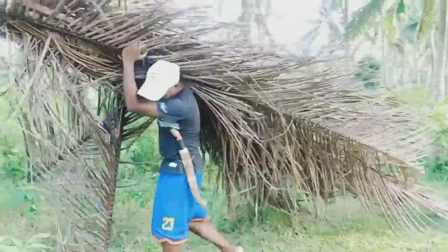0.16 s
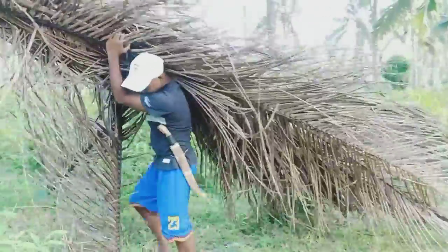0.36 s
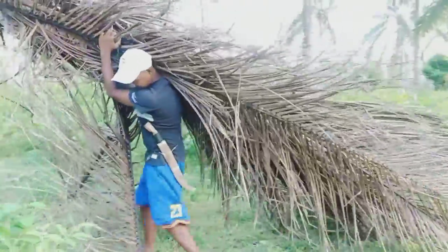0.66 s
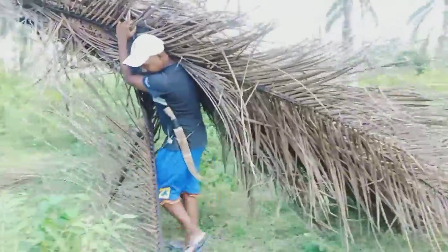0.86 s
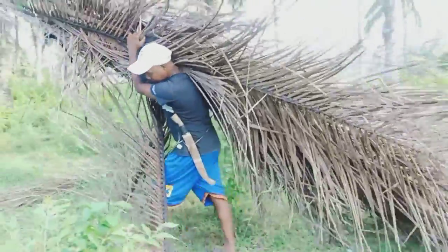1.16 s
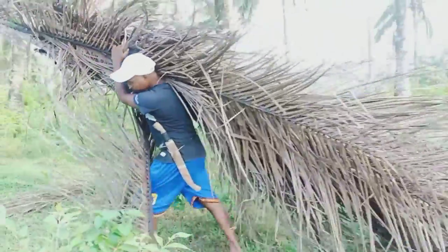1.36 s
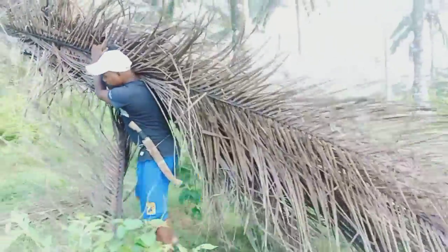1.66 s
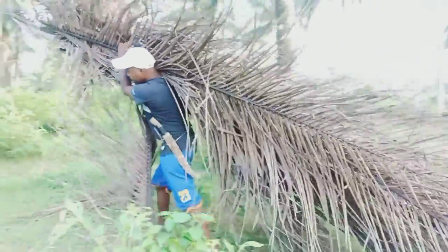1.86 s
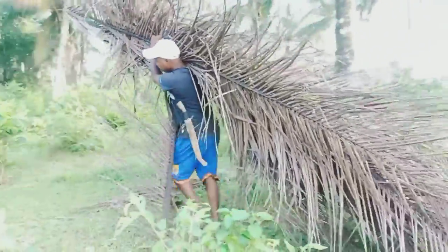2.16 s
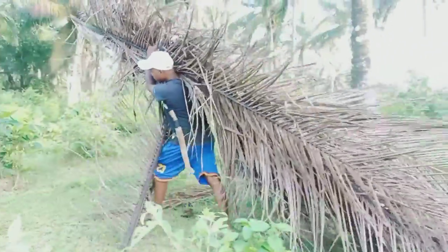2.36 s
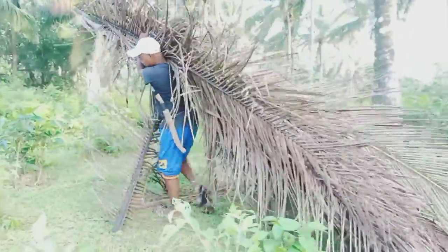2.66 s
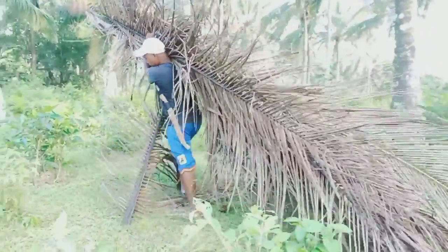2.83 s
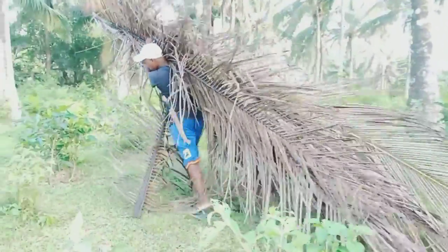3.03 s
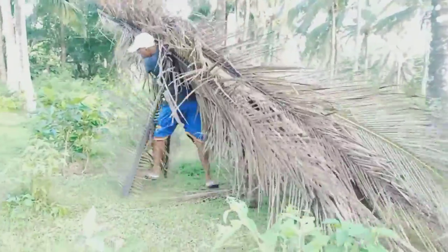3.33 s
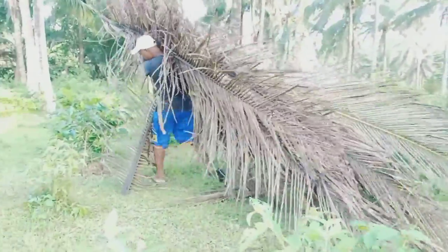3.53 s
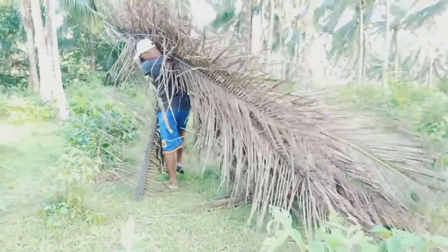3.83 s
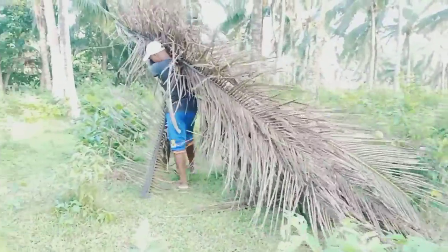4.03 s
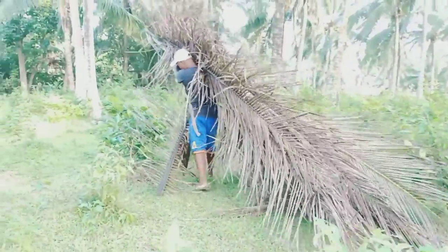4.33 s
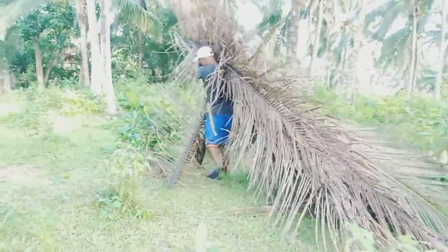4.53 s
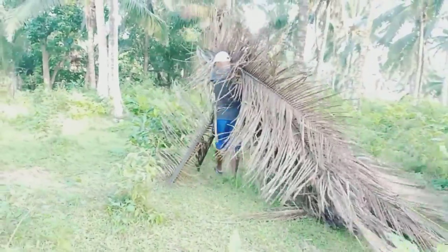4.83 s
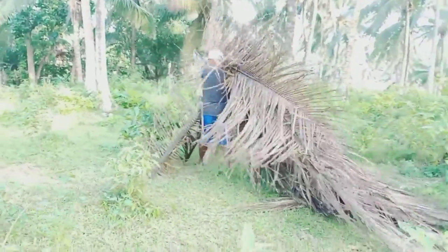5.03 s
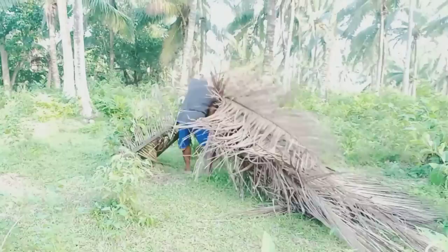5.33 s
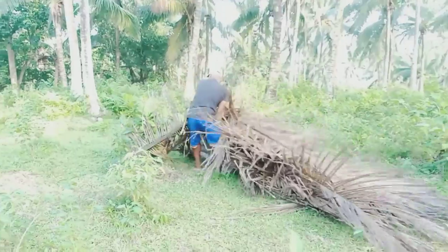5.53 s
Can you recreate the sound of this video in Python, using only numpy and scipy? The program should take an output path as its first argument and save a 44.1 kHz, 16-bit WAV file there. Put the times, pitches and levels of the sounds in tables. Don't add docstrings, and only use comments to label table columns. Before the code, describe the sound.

A big bundle of dry palm fronds rustles, crackles and scrapes over grass outdoors, with sharp snaps, then swings down with a dull thud.

```python
import sys
import numpy as np
from scipy import signal
from scipy.fft import rfft, irfft, next_fast_len
from scipy.io import wavfile
from scipy.ndimage import uniform_filter1d

SR = 44100
rng = np.random.default_rng(int(sys.argv[2]) if len(sys.argv) > 2 else 0)


def gain_from_db(level_db):
    decades = np.asarray(level_db, float) / 20
    return 10 ** decades


def file_out(sig):
    cols = np.atleast_2d(sig).T
    lim = np.clip(cols, -1, 1)
    pcm = np.round(lim * 32767).astype(np.int16)
    wavfile.write(sys.argv[1], SR, pcm)


N = 250929

# frequency in Hz, phase ahead of the left port in radians.
TURN_NEAR = [(1400, 0), (1900, -1.2), (2500, -.8), (3300, -2.2), (4000, -3.3), (4800, -3.4), (5400, -4.2),
             (6200, -5.8), (7500, -8), (15000, -22)]


def evened(x):
    return x / np.sqrt(np.mean(x ** 2) + 1e-20)


def read(points, hz):
    f, value = np.transpose(points)
    return np.interp(np.log(hz + 1), np.log(f + 1), value)


def add(mix, s, sound):
    part = mix[:, max(round(s * SR), 0):][:, :sound.shape[1]]
    part += sound[:, :part.shape[1]]


def causal(gain_db):
    log_gain = np.log(gain_from_db(gain_db))
    circle = np.concatenate([log_gain, log_gain[-2:0:-1]])
    return np.exp(np.conj(signal.hilbert(circle)))[:len(log_gain)]


def ports(paths, turn, shade=((1, 0), (2, 0))):
    # frequency in Hz, level in dB.
    colour = [(300, -12.5), (520, -11.5), (760, -16), (1000, -9), (1400, -11), (2050, -9.5), (2550, -3.44),
              (3300, -6), (3950, -3), (4450, -6), (5350, 2.65), (6150, -4), (6900, -14), (8800, -27)]
    # frequency in Hz, level in dB.
    ripple = [(8800, 0.0), (9200, -0.7), (9700, -4.2), (10500, -3.3), (11400, -0.4), (12200, -4.5),
              (13600, 1.3), (14300, -4.9), (14900, -5.0), (15600, -15.0)]
    # frequency in Hz, level difference in dB.
    lean = [(300, 1), (600, -1.5), (850, 5), (1200, -0.7), (2000, 0), (2600, -6), (3500, -10.5),
            (4400, -2.2), (5300, -0.5), (6000, -3.5), (7500, 4), (9000, 2), (10800, -4.5), (14000, 0.9)]
    # frequency in Hz, likeness from 0 to 1.
    likeness = [(200, .95), (400, .94), (750, .75), (1100, .85), (1900, .45), (2500, .5), (4200, .5),
                (5400, .48), (6500, .4), (8000, .26)]
    size = 2 * next_fast_len(paths.shape[-1] // 2 + 256)
    hz = np.fft.rfftfreq(size, 1 / SR)
    near, far = rfft(paths, size)
    colour_db = read(colour, hz) + read(ripple, hz) + read(shade, hz)
    half_lean_db = read(lean, hz) / 2
    left = causal(colour_db + half_lean_db)
    right = causal(colour_db - half_lean_db)
    same = np.clip(read(likeness, hz), 0, 1)
    late = np.exp(1j * (read(turn, hz) - np.angle(right / left)))
    at_right = same * late * near + np.sqrt(1 - same ** 2) * far
    return irfft([left * near, right * at_right], size)[..., :paths.shape[-1]]


def quarters(x, bass_hz=190):
    hz = np.fft.rfftfreq(x.shape[-1], 1 / SR)
    a, b, c = (1 / (1 + (hz / edge) ** 12) for edge in (1450, 4450, 7200))
    blade, tip, edge = b - a, 1 - c, c - b
    rib = a * (1 - 1 / (1 + (hz / bass_hz) ** 4))
    spectrum = rfft(x)
    return irfft([spectrum * band for band in (blade, rib, tip, edge)], x.shape[-1])


def crack(count, size, rise_s, tick_s, t60, scatter_db, ring_db):
    *noise, tint = rng.standard_normal((3, count, size))
    t = np.arange(size) / SR
    after = np.maximum(t - rise_s, 0)
    decay = np.exp(-after / tick_s) + gain_from_db(scatter_db - 60 * after / t60)
    burst = np.array(noise) * decay * np.minimum(t / rise_s, 1) ** 2
    patches = evened(uniform_filter1d(tint[:, :size // 2 + 1], size // 90, mode="wrap"))
    spectrum = rfft(burst)
    spectrum /= np.sqrt(uniform_filter1d(abs(spectrum) ** 2, size // 40))
    return irfft(spectrum * [causal(ring_db * patch) for patch in patches], size)


def hum(unlike=0.27, top_hz=200):
    # frequency in Hz, spectral density in dB per Hz.
    wash = [(15, -52), (25, -32), (70, -4), (86, 1.5), (116, -2.5), (188, -7.5), (300, -20), (390, -40),
            (660, -120)]
    common, left, right = rng.standard_normal((3, N))
    pair = common + unlike * np.array([left, right])
    hz = np.fft.rfftfreq(N, 1 / SR)
    gain = gain_from_db(read(wash, hz)) / (1 + (hz / top_hz) ** 4)
    return gain_from_db(-46.5) * evened(irfft(rfft(pair) * gain, N))


def haul(t):
    # time in seconds, effort in dB, crispness in dB.
    drag = [(0.0, -25, -0.5), (0.1, -32, 0), (0.35, -37, 0), (0.5, -33.5, -2), (1.1, -32, 0),
            (1.75, -34.5, 0), (2.1, -26, 1), (2.3, -30, 0.5), (2.72, -32, 0.5), (2.95, -29, 0.5),
            (3.3, -28, 1), (3.62, -28, -1), (3.9, -32, -0.5), (4.3, -34.5, 1), (4.85, -35.5, 0),
            (5.3, -28, -1.5), (5.49, -20.5, -1.5), (5.69, -20, -2.5)]
    # time in seconds, extra level in dB, half width in seconds.
    tugs = [
        (.6, 3, 0.04),
        (.8, 4.5, 0.073),
        (1.5, 4, 0.13),
        (2.55, 3, 0.29),
        (3.16, 5.5, 0.12),
        (3.69, 2.5, 0.054),
        (4.53, 4.5, 0.13),
        (5.17, 1, 0.063),
    ]
    # offset in dB, share of effort, share of crispness.
    answer = [
        (0, 1.04, -0.33),
        (-11, 0.82, -0.58),
        (-11, 1.02, 0.72),
        (-5, 1.15, 0.86),
    ]
    usual_db = -30
    s, effort_db, crisp_db = np.transpose(drag)
    tugs_db = sum(db * np.exp(-((t - at) / width) ** 2) for at, db, width in tugs)
    over_db = np.interp(t, s, effort_db) + tugs_db - usual_db
    crisp_db = np.interp(t, s, crisp_db)
    return [usual_db + db + effort * over_db + crisp * crisp_db for db, effort, crisp in answer]


def rustle(ticks_per_s=2200, spread_db=4.0, clump_db=0.99, patch_db=1.27, scrape_db=2.0, count=32):
    swing_s = 4.6, 5.3
    # frequency in Hz, phase ahead of the left port in radians.
    turn_far = [(1400, 0), (1900, -2), (2050, -4), (2500, -5.9), (3300, -6), (4000, -8.3), (4700, -9.1),
                (5600, -7.5), (6300, -9.6), (15000, -28)]
    # frequency in Hz, level in dB.
    shade_far = [(750, -0.5), (1100, -1), (2000, 0), (2550, 3), (3000, -4), (3900, -1), (4400, -3),
                 (5600, 0.5), (7200, -0.5)]
    clumps, *patches = (evened(uniform_filter1d(row, 700)) for row in rng.standard_normal((5, N)))
    size = gain_from_db(spread_db * np.minimum(rng.exponential(1, N), 3.6) + clump_db * clumps)
    size *= rng.random(N) < ticks_per_s / SR
    leaf = rng.integers(0, count, N)
    shapes = crack(count, size=1024, rise_s=0.00044, tick_s=0.0013, t60=0.044, scatter_db=-19.0, ring_db=4.0)
    ticks = np.zeros((2, N))
    for k in range(count):
        struck = (size * (leaf == k))[None]
        ticks += signal.oaconvolve(struck, evened(shapes[:, k]), axes=1)[:, :N]
    scrape = rng.standard_normal((2, N)) * gain_from_db(0.68 * clump_db * clumps)
    paths = evened(ticks) + gain_from_db(scrape_db) * evened(scrape)
    t = np.arange(N) / SR
    swing = np.interp(t, swing_s, [0, np.pi / 2])
    near = ports(paths * np.cos(swing), TURN_NEAR)
    far = ports(paths * np.sin(swing), turn_far, shade_far)
    out = np.zeros((2, N))
    for band, db, patch in zip(quarters(near + far), haul(t), patches):
        out += gain_from_db(db + patch_db * patch) * band / np.std(band.mean(0))
    return out


def snaps():
    # time in seconds, peak in dB, edge over blade in dB, splinter in dB.
    breaks = [(0.0333, -18.5, -1, -21), (0.169, -22, 2, -16), (0.2046, -14.5, 2, -5),
              (0.2308, -23, -1, -4.5), (0.4259, -25.5, -8, -16), (0.4773, -27, -2, -1),
              (0.5415, -21, 0, -19), (0.5774, -23.5, 3, -2), (0.6053, -22.5, -2, -8.5),
              (0.6405, -23, -13, -18), (0.711, -25, 1, -8), (0.7359, -21, 3, -4), (0.8147, -22, -9, -4),
              (0.8857, -14, 4.5, -10), (1.1423, -31.5, -33.5, -16), (1.2598, -19, -10, -10),
              (1.3485, -14.5, -10.5, -11), (1.4537, -19.5, -4, -16), (1.8687, -24, -5, -20),
              (1.9046, -27, 0, -18), (2.391, -24, 15, -14), (3.1574, -16.5, -5, -12),
              (3.1431, -14, -8, -16), (3.2311, -17.5, -3, 2.5), (3.4038, -27, -19, -12),
              (3.46, -18.5, -5, -5), (3.5051, -23, -11, -15), (3.7266, -23, -7, -10), (4.1388, -29, 24, 1),
              (4.5314, -28, 12, 6)]
    # time in seconds, peak in dB, edge over
    # blade in dB.
    weaker_breaks = [(.1047, -30, 7), (0.33, -31, 7), (0.3578, -28, -4), (0.5084, -28, 2), (0.846, -28, 19),
                     (1.012, -25.5, 10), (1.048, -28, 8), (1.5224, -27, 4), (1.709, -28, -3), (1.961, -30, 7),
                     (2.122, -25, 8), (2.193, -23, 4), (2.3432, -26, 4), (2.458, -28, -6), (3.014, -19, -3),
                     (2.949, -32, -2), (3.0544, -21.5, -2), (3.2643, -23.5, 6), (4.2174, -24, 9),
                     (4.2577, -23.5, -5), (4.2951, -25, 7), (4.3221, -30, 21), (4.4155, -26, 12),
                     (4.6235, -24.5, -11), (4.704, -28, -17), (4.812, -30, -1), (4.9227, -23, 1),
                     (4.9825, -29.5, -16), (5.112, -26.5, 5), (5.3278, -25, 5)]
    # frequency in Hz, level in dB.
    break_shade = [(3800, -1), (4600, -2), (5400, 3.5), (7300, -1.5), (9500, 1), (15000, 3.5)]
    weaker_splinter_db, rib_under_blade_db = -9.5, -15.5
    rows = breaks + [(*weaker, weaker_splinter_db) for weaker in weaker_breaks]
    shapes = crack(len(rows), size=1536, rise_s=0.0016, tick_s=0.001, t60=0.026, scatter_db=-6.0, ring_db=3.0)
    bands = quarters(ports(shapes, TURN_NEAR, break_shade))
    bands /= abs(bands.mean(1)).max(-1)[:, None, :, None]
    out = np.zeros((2, N))
    for k, (s, db, edge_db, splinter_db) in enumerate(rows):
        shares_db = [-edge_db / 2, rib_under_blade_db - edge_db / 2, splinter_db, edge_db / 2]
        gains = gain_from_db(db + np.array(shares_db) + [4.46, 3.7, 2.85, 2.16])
        add(out, s - 0.0006, np.tensordot(gains, bands[:, :, k], 1))
    return out


def knocks():
    # time in seconds, peak in dB, ring in Hz.
    bumps = [
        (0.424, -31, 505),
        (2.357, -28.5, 547),
        (2.628, -30, 152),
        (3.15, -32.5, 216),
        (4.81, -27.5, 544),
        (4.809, -35, 956),
    ]
    out = np.zeros((2, N))
    t = np.arange(2000) / SR
    for s, db, hz in bumps:
        turns = 2 * np.pi * hz * t
        ring = np.sin(turns) + 0.86 * np.sin(4.6 * turns) + 0.36 * np.sin(0.7 * turns)
        envelope = gain_from_db(db + 0.5 - 60 * t / 0.045) * np.minimum(t / 0.0033, 1)
        add(out, s + 0.00243, np.tile(envelope * ring, (2, 1)))
    return out


def squeaks():
    # start in seconds, length in seconds, first pitch in Hz, last pitch in Hz, level in dB.
    rubs = [
        (2.564, 0.076, 1720, 1670, -39),
        (4.398, .085, 1210, 1140, -47),
        (4.476, 0.043, 2410, 2270, -43),
        (4.479, .045, 1120, 1070, -44),
    ]
    out = np.zeros((2, N))
    for s, length, first_hz, last_hz, db in rubs:
        t = np.arange(0, length, 1 / SR)
        wobble_db = 0.84 * evened(uniform_filter1d(rng.standard_normal(4000), 250))[:len(t)]
        glide_hz = np.interp(t, [0, length], [first_hz, last_hz])
        tone = np.sin(2 * np.pi * np.cumsum(glide_hz) / SR)
        envelope = gain_from_db(db + 5.0 + wobble_db) * signal.windows.tukey(len(t), 0.4)
        add(out, s, np.tile(envelope * tone, (2, 1)))
    return out


def landing(low_hz=110, high_hz=300):
    # time in seconds, thud level in dB.
    thuds = [
        (5.3, -50),
        (5.438, -60),
        (5.464, -45),
        (5.506, -51),
        (5.556, -35),
        (5.656, -45),
        (5.69, -40),
    ]
    s, db = np.transpose(thuds)
    t = np.arange(s[0], N / SR, 1 / SR)
    band = signal.butter(2, [low_hz, high_hz], "bandpass", fs=SR, output="sos")
    rumble = evened(signal.sosfilt(band, rng.standard_normal(len(t))))
    envelope = gain_from_db(np.interp(t, s, db) + 0.5) * np.minimum((t - s[0]) / 0.21, 1)
    out = np.zeros((2, N))
    add(out, s[0], np.tile(envelope * rumble, (2, 1)))
    return out


def scene():
    return hum() + rustle() + snaps() + knocks() + squeaks() + landing()


def band_limit(x):
    return signal.sosfilt(signal.butter(12, 16430, fs=SR, output="sos"), x)


def record(dry):
    rounded = dry / (1 + (dry / 0.93) ** 6) ** (1 / 6)
    return band_limit(rounded)


dry = scene()
out = record(dry)
file_out(out)
```